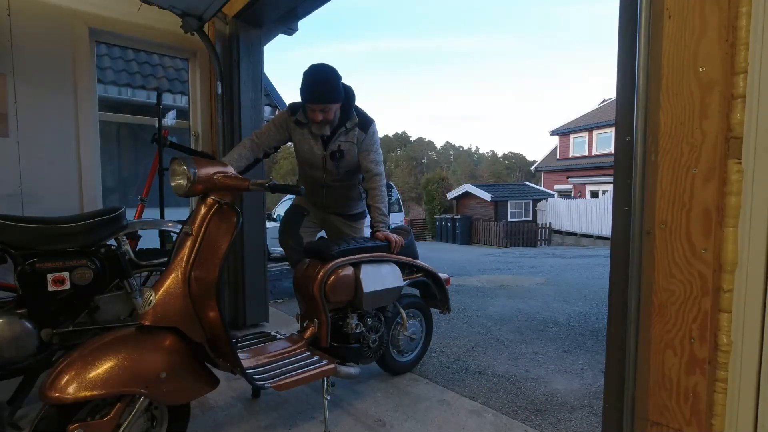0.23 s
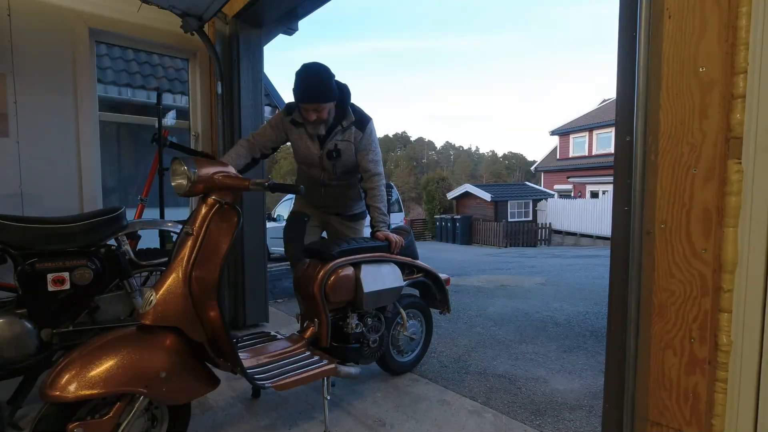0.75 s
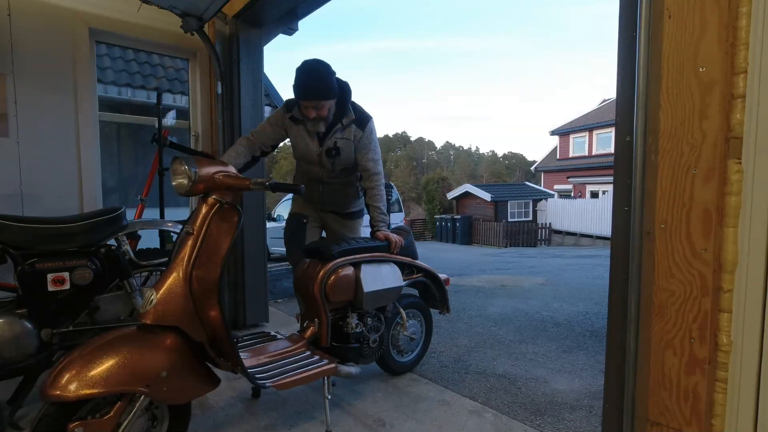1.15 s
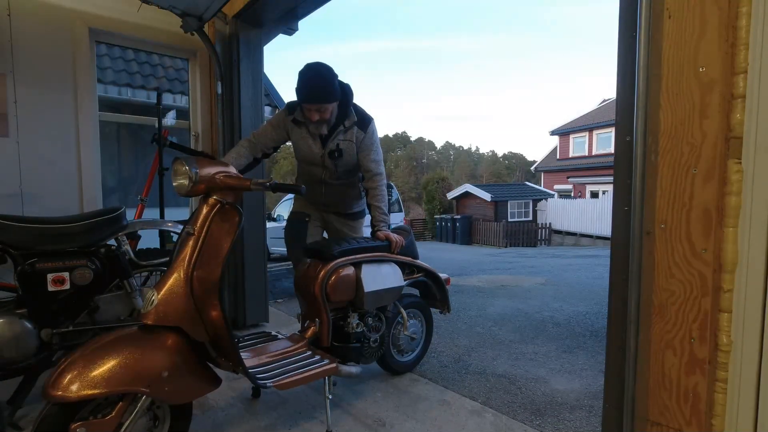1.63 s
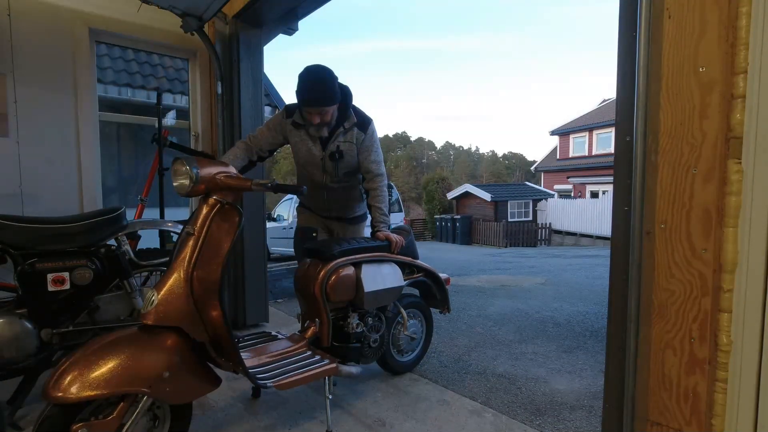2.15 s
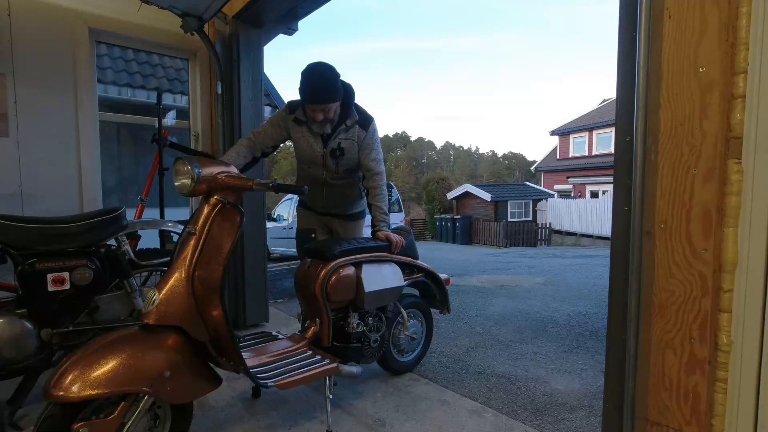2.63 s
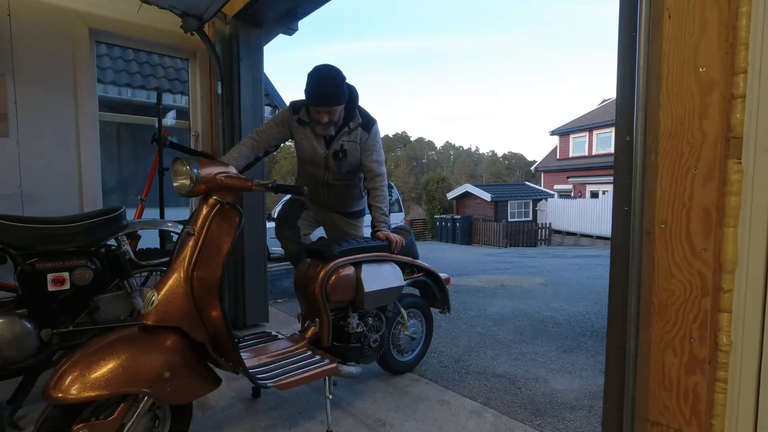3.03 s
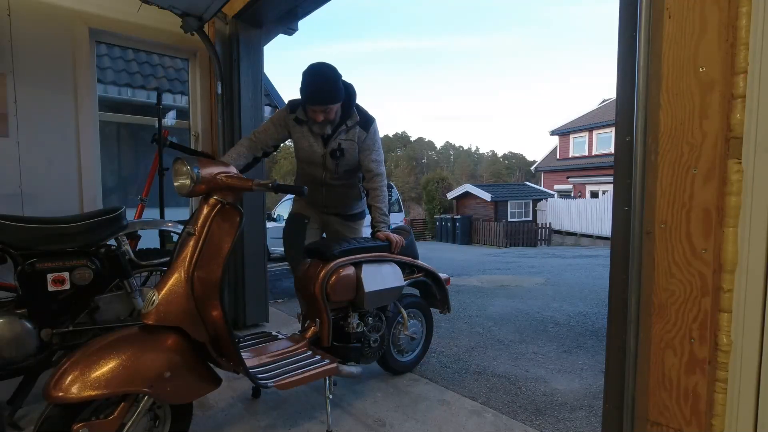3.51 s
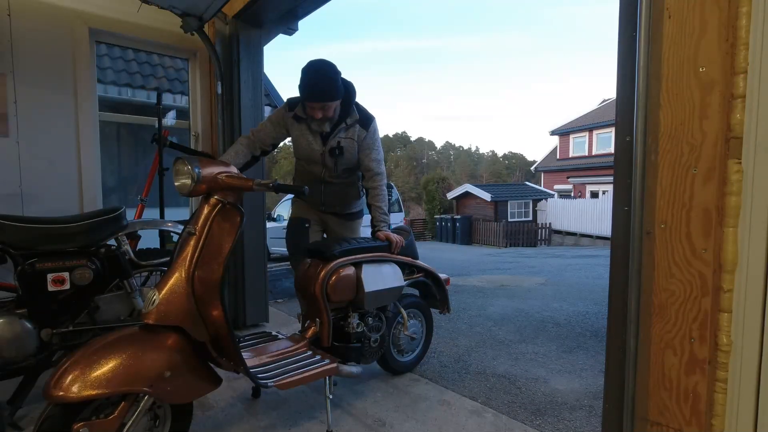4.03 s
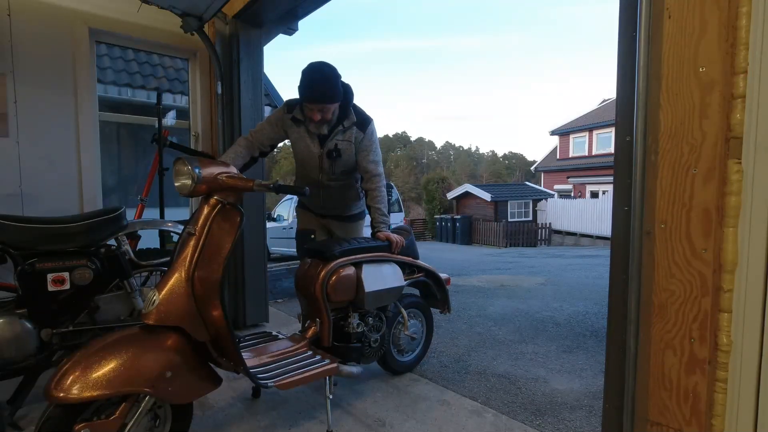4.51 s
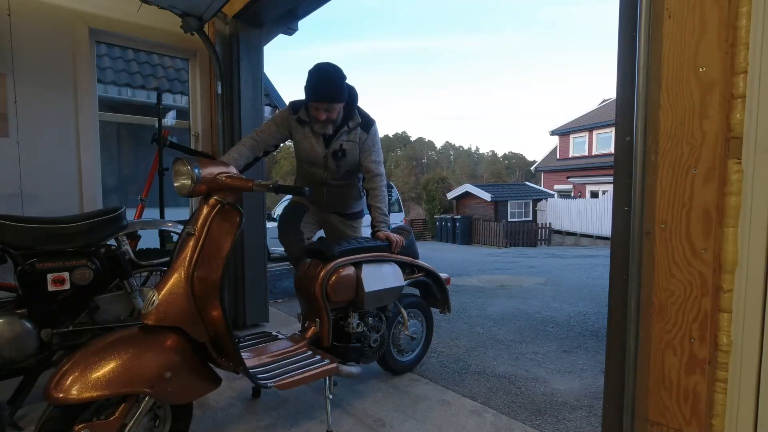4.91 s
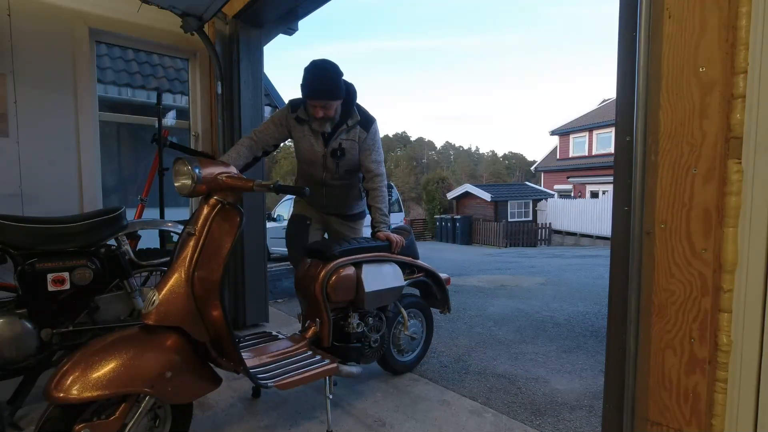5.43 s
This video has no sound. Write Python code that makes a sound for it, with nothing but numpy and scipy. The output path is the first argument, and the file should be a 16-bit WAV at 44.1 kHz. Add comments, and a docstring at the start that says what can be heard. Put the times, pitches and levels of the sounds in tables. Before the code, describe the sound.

A scooter's engine is eased over with thin, whistling hisses of air and soft, dull bumps. The starter is kicked and the engine gives a brief, hollow, raspy churn without firing, then the lever springs back with ringing steel clacks. After more hissing comes a second failed kick, more clacks and a small rattle from the stand. It is heard from close by in a garage doorway, with a short echo and faint outdoor air.

```python
"""A small leak hisses and whistles as a two-stroke scooter's piston rises, and breathes as it returns.
The scooter is kicked over twice at a garage door and does not fire. Each kick whirls the gears
and pumps a hollow, gliding note through the engine; then the stiff lever springs back and clacks
twice on its stop, ringing the steel body. The scooter settles on its stand with a loose rattle."""
import sys
import numpy as np
from scipy import signal
from scipy.fft import rfft, irfft, next_fast_len
from scipy.io import wavfile
from scipy.ndimage import map_coordinates

SR = 44100
rng = np.random.default_rng(int(sys.argv[2]) if len(sys.argv) > 2 else 0)


def int16_out(signal):
    """Quantize to a 16-bit WAV file."""
    q = np.round(np.clip(np.atleast_2d(signal).T, -1, 1) * 32767)
    wavfile.write(sys.argv[1], SR, q.astype(np.int16))


N = 249606

# Two compressions per kick. Each row: start, rise and hiss length in seconds,
# then hiss, knock and rasp levels in dB.
COMPRESSIONS = [(2, 0.013, 0.021, -32, -30, -31.5), (2.094, 0.0021, 0.054, -31, -34, -36),
                (4.328, 0.014, 0.031, -33.5, -36, -32.5), (4.4227, 0.0026, 0.07, -31.5, -33.5, -32)]


def amp(db):
    """Decibels to gain."""
    return 10 ** (np.asarray(db) / 20)


def unit(x):
    """Scale to rms 1."""
    return x / np.sqrt(np.mean(x ** 2) + 1e-20)


def interp_log(points, hz):
    """Interpolate (Hz, value) rows on a log frequency axis."""
    point_hz, value = np.transpose(points)
    return np.interp(np.log(hz + 1e-6), np.log(point_hz), value)


def colour(x, spectrum):
    """Filter by (Hz, dB) rows."""
    hz = np.fft.rfftfreq(len(x), 1 / SR)
    return irfft(rfft(x) * amp(interp_log(spectrum, hz)), len(x))


def noise(spectrum, size=N):
    """Coloured noise, rms 1."""
    return unit(colour(rng.standard_normal(next_fast_len(size)), spectrum)[:size])


def resonate(x, modes):
    """Sum of (Hz, width Hz, dB) resonances, each applied twice for steep skirts; rms 1."""
    out = 0
    for hz, width_hz, db in modes:
        b, a = signal.iirpeak(hz, hz / (1.72 * width_hz), SR)
        out = out + amp(db) * unit(signal.lfilter(b, a, signal.lfilter(b, a, x)))
    return unit(out)


def wander(rate_hz):
    """Smooth random drift, rms 1."""
    return noise([(rate_hz, 0), (2 * rate_hz, -40), (20 * rate_hz, -120)])


def swell(hold_s, rise_s, release_db_per_s, sag_db_per_s, bend=2):
    """Envelope: power-law rise, steady sag, release after hold_s."""
    t = np.arange(SR * 3 // 4) / SR
    fall_db = sag_db_per_s * t + release_db_per_s * np.maximum(t - hold_s, 0)
    return np.minimum(t / rise_s, 1) ** bend * amp(-fall_db)


def add(mix, start_s, sound):
    """Mix a sound in at start_s."""
    part = mix[max(round(start_s * SR), 0):][:len(sound)]
    part += sound[:len(part)]


def outdoor_air(level_db=-67, drift_db=0.5):
    """Faint, drifting yard air, as a mid and side pair."""
    # Each row: frequency in Hz, level in dB.
    air_spectrum = [(15, -42.5), (25, -18.5), (126, -2.5), (322, -3), (433, -6), (997, -12), (1140, -16),
                    (1270, -14), (1620, -22), (2120, -18.5), (4870, -27.5), (6050, -26.5), (8350, -30),
                    (12000, -36.5), (15000, -41.5)]
    breeze = amp(level_db + drift_db * wander(rate_hz=2.3))
    return breeze * noise(air_spectrum), breeze * noise(air_spectrum)


def garage(x, build_s=0.011):
    """Dense reflections build up and die, each band at its own speed."""
    # Each row: frequency in Hz, t60 in seconds.
    decay_times = [(100, 0.7), (400, 0.51), (1000, 0.63), (2800, 0.44), (7000, 0.29), (14000, 0.37)]
    hz, t, bands = signal.stft(rng.standard_normal(SR * 3 // 4), SR, nperseg=256)
    damping = amp(-60 * t / interp_log(decay_times, hz)[:, None])
    _, tail = signal.istft(bands * damping, SR, nperseg=256)
    tail *= 1 - np.exp(-np.arange(len(tail)) / SR / build_s)
    return signal.fftconvolve(x, tail / np.linalg.norm(tail))[:N]


def stereo(direct, diffuse_mid, diffuse_side, echo_decay_s=0.012):
    """Two close microphones: direct sound is nearly alike in both, diffuse treble is not."""
    # Each row of both: frequency in Hz, side gain in dB.
    direct_width = [(120, -48), (400, -69), (1400, -46.5), (2400, -38.5), (5000, -46.5), (10000, -11)]
    diffuse_width = [(100, -44), (700, -69), (1400, -61.5), (2400, -25.5), (4400, -2), (10000, -13.5)]
    t = np.arange(SR // 10) / SR
    echoes = rng.standard_normal(len(t)) * np.exp(-t / echo_decay_s)  # off door frame and floor
    near_side = signal.fftconvolve(direct, echoes / np.linalg.norm(echoes))[:N]
    mid = direct + diffuse_mid
    side = colour(near_side, direct_width) + colour(diffuse_side, diffuse_width)
    return np.array([(mid + side) * amp(-0.15), mid - side])


def pivot_squeaks(jitter_hz=220):
    """The lever's dry pivot gives short, gliding squeals."""
    # Each row: start in seconds, level in dB, first and last pitch in Hz, length in seconds.
    squeaks = [(0.945, -67, 3250, 3010, 0.084), (3.816, -68, 2740, 3800, 0.08),
               (4.03, -76.5, 2500, 3160, 0.05)]
    out = np.zeros(N)
    for start_s, db, first_hz, last_hz, length_s in squeaks:
        hz = np.linspace(first_hz, last_hz, int(length_s * SR))
        hz += jitter_hz * wander(rate_hz=270)[:len(hz)]
        squeal = np.sin(2 * np.pi * np.cumsum(hz) / SR)
        add(out, start_s, amp(db) * 2 * np.hanning(len(hz)) * squeal)
    return out


def stand_scrape(start_s=5.366, level_db=-39):
    """The stand's foot slides a little over the concrete."""
    # Each row: frequency in Hz, level in dB.
    scrape_spectrum = [(200, -10), (500, 22.5), (1400, 9), (2100, 11), (2600, -33), (8000, -43)]
    out = np.zeros(N)
    envelope = swell(hold_s=0.08, rise_s=0.005, release_db_per_s=150, sag_db_per_s=120)
    add(out, start_s, amp(level_db) * envelope * noise(scrape_spectrum, len(envelope)))
    return out


def thuds(sharp=0.19, relax_s=0.006):
    """Piston air, boot and rocking body bump dully: a low tone that starts sharp, with noise round it."""
    # Each row: start in seconds, level in dB, pitch in Hz, rise in seconds, tone's share of the power.
    bumps = [(0.498, -52, 393, 0.0085, 0.08), (.725, -35.5, 462.6, 0.01, 0.73),
             (0.725, -47.5, 213, 0.01, 0.9), (0.789, -46, 455, 0.0066, 0.85),
             (0.822, -56, 450.4, 0.0079, 0.74), (1.286, -45, 284.5, 0.021, 0.38),
             (1.345, -43, 283.4, 0.018, 0.37), (1.501, -60, 237, 0.017, 0.08),
             (1.816, -57, 199, 0.01, 0.53), (2.115, -35.5, 401, 0.0078, 0.9), (2.207, -36, 301, 0.008, 0.4),
             (2.237, -43, 190, 0.0045, 1), (2.64, -53.5, 225, 0.0058, 0.7), (2.794, -57, 205, 0.027, 0),
             (2.949, -42.5, 217, 0.0043, 1), (3.012, -33, 532.5, 0.013, 0.58),
             (3.098, -27.5, 448, 0.0076, 0.72), (3.17, -34.5, 439, 0.017, 0.4),
             (3.339, -41, 443, .006, 0.96), (3.416, -33, 495, 0.0047, 0.3),
             (3.427, -30.5, 286, 0.0052, 0.47), (3.444, -39, 476, 0.0056, 0.24),
             (3.481, -44, 428, 0.0078, 0.13), (4.792, -57, 177, 0.024, 0.12), (5.072, -27, 482, 0.006, 1),
             (5.366, -36, 567, 0.0064, 0.54), (5.377, -31, 264, 0.0054, 0.6)]
    # Noise round a bump. Each row: ratio to the pitch, level in dB.
    spread_spectrum = [(.15, -44), (.45, -9), (.72, -1), (1.3, 1), (2.2, -10.5), (4, -23), (12, -33),
                       (40, -67.5)]
    out, t = np.zeros(N), np.arange(SR // 4) / SR
    for start_s, db, hz, rise_s, share in bumps:
        spread = noise([(ratio * hz, band_db) for ratio, band_db in spread_spectrum], len(t))
        cycles = np.cumsum(hz * (1 + sharp * np.exp(-t / relax_s))) / SR
        tone = unit(np.sin(2 * np.pi * cycles))
        push = t / rise_s * np.exp(1 - t / rise_s)
        add(out, start_s, amp(db) * push * (np.sqrt(share) * tone + np.sqrt(1 - share) * spread))
    return out


def leak_whistle():
    """The leak's resonances, shifting a little in pitch from push to push."""
    # Each row: frequency and width in Hz, level in dB.
    whistle_modes = [(2053, 85, -15), (2620, 42, -16.5), (3027, 440, -17), (5420, 90, -21.5),
                     (6107, 190, 1.5), (6356, 160, -4), (7060, 110, -11.5), (7140, 73, -19),
                     (8200, 120, -30.5), (9400, 130, -24.5), (10250, 150, -23.5), (11350, 220, -26.5),
                     (11950, 146, -33)]
    # Each row: time in seconds, pitch shift in cents.
    pitch_bend = [(0.101, 55), (0.723, 20), (0.851, 5), (2.049, -4), (3.599, 0), (3.902, 22), (5.599, 7.5)]
    whistle = resonate(rng.standard_normal(N), whistle_modes)
    cents = np.interp(np.arange(N) / SR, *np.transpose(pitch_bend))
    return map_coordinates(whistle, [np.cumsum(2 ** (cents / 1200))], order=5, mode="reflect")


def leak(jet_db=-15, growth=0.7, reference_db=-43, flutter_db=1.0, rough_db=1.4):
    """Air through a small leak: firm, slow pushes whistle; faint puffs and fast kicks are breathier."""
    # Whistling hisses as the piston rises, faint breathy draws as it returns.
    # Each row: start and length in seconds, level in dB, rise in seconds, extra rush in dB.
    puffs = [(0.062, 0.063, -46, 0.019, 0), (0.231, 0.03, -66, 0.03, 18.5), (0.684, 0.15, -41.5, 0.021, -7),
             (0.94, 0.056, -62, 0.04, 6.5), (1.177, 0.024, -73, 0.022, 6), (1.953, 0.056, -63.5, 0.018, 14),
             (2.316, 0.21, -46, 0.051, -0.5), (2.727, 0.07, -61.5, 0.039, 12),
             (2.913, 0.096, -42.5, 0.065, 12), (3.511, 0.17, -47, 0.074, 2.5),
             (3.729, 0.15, -54.5, 0.12, 4), (4.021, 0.053, -67.5, 0.035, 6), (4.2, 0.18, -65, .016, 7),
             (4.501, 0.066, -49.5, 0.027, 11), (4.624, 0.059, -64.5, 0.031, 14),
             (4.838, 0.12, -66.5, 0.035, 22), (5.559, 0.057, -54.5, 0.007, 6.5),
             (5.594, 0.06, -47, 0.014, -2)]
    # Each row: frequency in Hz, level in dB.
    jet_spectrum = [(600, -17), (1700, -1), (2300, 4.5), (3300, 3.5), (4400, -3.5), (5400, 3.5), (6100, -1),
                    (7100, -3.5), (7900, -1.5), (9200, -9.5), (10400, -4.5), (13000, -12.5), (15500, -30.5)]
    flow, broad = np.zeros((2, N))
    for start_s, length_s, db, rise_s, rush_db in puffs:
        pressure = amp(db) * swell(length_s, rise_s, release_db_per_s=403.5, sag_db_per_s=45)
        add(flow, start_s, pressure)
        add(broad, start_s, amp(rush_db) * pressure)
    for start_s, rise_s, length_s, db, *_ in COMPRESSIONS:  # dies faster at cranking speed
        pressure = amp(db) * swell(length_s, rise_s, release_db_per_s=660, sag_db_per_s=105.5)
        add(flow, start_s, pressure)
        add(broad, start_s, pressure)
    rush = broad * amp(jet_db) * (1 + growth * flow / amp(reference_db))
    rush *= unit(amp(rough_db * wander(rate_hz=460)))
    whistle = flow * leak_whistle()
    return amp(flutter_db * wander(rate_hz=76)) * (whistle + rush * noise(jet_spectrum))


def ratchet_rasp(grains_per_s=400, scatter_db=5, decay_s=0.018):
    """Ratchet teeth grind under each compression: a short, bright burst of grit."""
    # Each row: frequency in Hz, level in dB.
    grit_spectrum = [(1500, -8.5), (3000, 2.5), (4500, -17.5), (6100, 11), (6800, -12), (7400, 10),
                     (8300, 4.5), (9200, -7), (10400, 2), (12500, -14), (14500, -27)]
    load, t = np.zeros(N), np.arange(SR // 5) / SR
    for start_s, rise_s, *_, db in COMPRESSIONS:
        attack = np.minimum(t / rise_s, 1) ** 2
        release = np.exp(-np.maximum(t - 1.02 * rise_s, 0) / decay_s)
        add(load, start_s, amp(db) * attack * release)
    grains = (rng.random(N) < grains_per_s / SR) * rng.choice([-1, 1], N)
    sizes = amp(scatter_db * rng.uniform(-1.1, 1, N))
    return load * unit(colour(grains * sizes, grit_spectrum))


def pumping(rough_db=2.2):
    """Air in crankcase and exhaust swings at one hollow note that sinks and climbs with the piston."""
    # One curve per kick. Each row: time in seconds, pitch in Hz, level in dB.
    glides = [
        [(1.998, 227.4, -60), (2.02, 198, -30.5), (2.033, 172.4, -35), (2.046, 153, -21.5), (2.062, 85.4, -43),
         (2.08, 115.4, -35), (2.095, 161, -25.5), (2.11, 170, -37), (2.132, 165, -35.5), (2.17, 160, -58)],
        [(4.334, 232, -58), (4.352, 224.7, -30.5), (4.364, 175.4, -32.5), (4.376, 156, -22.5), (4.39, 85, -33),
         (4.412, 127, -38.5), (4.43, 171, -29), (4.447, 207, -31.5), (4.467, 156, -38), (4.52, 158, -54)],
    ]
    out = np.zeros(N)
    for glide in glides:
        times_s, hz, db = np.transpose(glide)
        t = np.arange(times_s[0], times_s[-1], 1 / SR)
        cycles = np.cumsum(np.interp(t, times_s, hz)) / SR
        add(out, times_s[0], amp(np.interp(t, times_s, db)) * unit(np.sin(2 * np.pi * cycles)))
    return out * amp(rough_db * wander(rate_hz=110))


def cranking(push_s=0.15, teeth_hz=190, slip=0.14, churn=2.2, modes_db=-4):
    """Gear teeth knock unevenly and air churns in the engine case, swelling and fading with each kick."""
    # Each row: start in seconds, level in dB, run-down in dB per second, spin-up in seconds.
    kicks = [(1.983, -30.5, 142, 0.037), (4.308, -30, 177, 0.057)]
    # What the case lets out. Each row: frequency in Hz, level in dB.
    case_spectrum = [(25, -39.5), (55, -16), (100, -12.5), (130, -14.5), (200, -4.5), (270, -3.5),
                     (340, -7), (400, -6), (570, -8), (800, -15.5), (1500, -23), (3500, -30), (8000, -32),
                     (15000, -44.5)]
    # Case and exhaust. Each row: frequency and width in Hz, level in dB.
    case_modes = [(187, 88, -4), (229, 60, 0.5), (398, 24, -7.5), (564, 21, -15.5), (1027, 110, -7.5),
                  (1271.6, 7.3, -8.5), (4970, 160, -18)]
    spin = np.zeros(N)
    for start_s, db, run_down_db_per_s, spin_up_s in kicks:
        envelope = swell(push_s, spin_up_s, run_down_db_per_s, sag_db_per_s=8, bend=1.23)
        add(spin, start_s, amp(db) * envelope)
    teeth_passed = np.cumsum(teeth_hz * (1 + slip * wander(rate_hz=25))) / SR
    knocks = np.diff(np.floor(teeth_passed), prepend=0) * rng.uniform(0.1, 1, N)
    drive = unit(knocks - knocks.mean()) + churn * rng.standard_normal(N)
    return spin * unit(unit(colour(drive, case_spectrum)) + amp(modes_db) * resonate(drive, case_modes))


def softness_db(hz, bright_hz, order=2.6):
    """A soft contact loses the treble above bright_hz."""
    return -10 * np.log10(1 + (hz / bright_hz) ** (2 * order))


def body_ring(t, bright_hz, favoured_hz, boost_db, scatter_db=3.0, favour_octaves=0.059, split_hz=11):
    """The struck spot favours one body mode; loose panels split every mode into a beating pair."""
    # Each row: frequency in Hz, level in dB, t60 in seconds.
    body_modes = [(409.6, -3.5, 0.79), (446, -11.5, 0.19), (516, -10, .36), (548, 8.5, 0.28),
                  (624, -8.5, 1), (728, 1.5, 0.31), (890, -2, 0.69), (935, 0, 0.41), (1000, 2, 0.32),
                  (1116, -11, 0.45), (1268, 3, 0.31), (1289, 8.5, 0.14), (1464, -7, 0.5),
                  (2450, -11.5, 0.43), (2960, -6.5, 0.18), (3470, -12, 0.16), (4050, -7, 0.17),
                  (4400, -8, 0.26), (4818, -6.5, 0.18), (5180, -9, 0.3), (5360, -1, 0.17), (5800, -7, 0.23),
                  (6200, -1.5, .28), (6880, -5.5, 0.22), (7980, -18, 0.33)]
    mode_hz, mode_db, t60_s = np.transpose(body_modes)
    count = len(body_modes)
    gains = unit(amp(mode_db + softness_db(mode_hz, bright_hz) + scatter_db * rng.standard_normal(count)))
    gains *= amp(boost_db * np.exp(-(np.log2(mode_hz / favoured_hz) / favour_octaves) ** 2))
    pairs_hz = mode_hz + split_hz * rng.standard_normal((2, count))
    waves = sum(np.sin(2 * np.pi * (hz * t[:, None] + rng.random(count))) for hz in pairs_hz)
    damping = amp(-60 * t[:, None] / t60_s)
    return (waves * damping) @ gains / np.sqrt(count)


def steel_clatter(t, bright_hz, decay_s, panels_db=0.5, crack=0.2, crack_s=0.00047):
    """Struck steel gives a crack and a short, dense clatter."""
    # Each row: frequency in Hz, level in dB.
    steel_spectrum = [(40, -48.5), (110, -25), (220, 1.5), (340, -1.5), (480, 0.5), (750, -2.5), (1100, -7),
                      (1700, -10.5), (2700, -6.5), (4000, -13), (6500, -8.5), (8200, -10.5), (10000, -10),
                      (12000, -17), (15000, -34.5)]
    # Lever and panels. Each row: frequency and width in Hz, level in dB.
    panel_modes = [(482, 102, 1), (1228, 78, 1), (1746, 120, -7), (3456, 110, 1), (4308, 410, 3),
                   (4744, 42, -5), (5333, 66, -1.5), (5956, 270, 3), (7010, 130, 0.5), (7810, 170, -5.5)]
    steel = noise(steel_spectrum, len(t))
    steel += amp(panels_db) * resonate(rng.standard_normal(SR), panel_modes)[-len(t):]
    grid_hz = np.geomspace(30, 20000, 80)
    burst = unit(colour(steel, np.c_[grid_hz, softness_db(grid_hz, bright_hz)]))
    return (np.exp(-t / decay_s) + crack * np.exp(-t / crack_s)) * burst


def contacts(knock_bright_hz=8000, knock_decay_s=0.012, knock_mode_hz=4818, knock_boost_db=9):
    """Every blow on steel: the lever's returns, the drive's knock at each compression, stray taps."""
    # Two returns, each a release, stop, rebound, tap and touch of the stand. Each row: start in seconds,
    # level in dB, brightness in Hz, rise and decay in seconds, favoured mode in Hz, its boost in dB.
    lever_returns = [(3.0, -27, 3230, 0.004, 0.013, 4818, 7), (3.094, -26, 6700, 0.0005, 0.02, 4818, 21),
                     (3.166, -23.5, 7100, 0.00025, 0.012, 1230, 1.5),
                     (3.336, -43, 2520, 0.0077, 0.019, 882, 17),
                     (3.4125, -39.5, 2470, 0.0035, 0.0099, 735, 9),
                     (4.919, -30, 1820, 0.0029, 0.011, 541, 4),
                     (5.0056, -24, 7940, 0.00048, 0.012, 5420, 14.5),
                     (5.0684, -23, 7450, 0.00039, 0.0092, 3460, 15),
                     (5.282, -37.5, 2560, 0.0035, 0.0074, 4380, 6),
                     (5.362, -32, 2330, 0.0072, 0.0067, 1281, 8)]
    # Taps and scuffs of boot and linkage. Each row: the first five columns above.
    stray_taps = [(.002, -63.5, 2760, 0.0024, 0.082), (0.4985, -45, 6500, 0.001, 0.0092),
                  (1.291, -53, 2000, .004, 0.0059), (1.358, -52.5, 9100, 0.013, 0.021),
                  (1.5, -69, 2200, 0.0017, 0.012), (1.779, -62, 9000, 0.00072, 0.0044),
                  (1.981, -48.5, 900, 0.0016, 0.011), (2.034, -51, 8000, .002, 0.013),
                  (2.209, -41, 1500, 0.003, 0.0057), (2.641, -55.5, 2610, 0.0006, 0.0039),
                  (2.914, -53.5, 2585, 0.0059, 0.047), (4.375, -40.5, 6000, 0.0011, 0.0057),
                  (4.62, -50.5, 3000, .001, 0.0029), (4.847, -42, 2790, 0.0013, 0.00098),
                  (4.868, -54.5, 1830, 0.002, 0.09), (4.985, -49, 9400, 0.0052, 0.032)]
    knocks = [(start_s, db, knock_bright_hz, rise_s, knock_decay_s, knock_mode_hz, knock_boost_db)
              for start_s, rise_s, _, _, db, _ in COMPRESSIONS]
    return lever_returns + knocks + [(*tap, 1, 0) for tap in stray_taps]  # taps favour no mode


def steel_blows(clatter_db=5.0, ring_db=-3.5, chatter=0.33, typical_s=0.016, full_db=-22, lowest_hz=150):
    """Each blow clatters and rings the body; a longer, harder one leaves more energy ringing."""
    clatter, ring = np.zeros((2, N))
    t = np.arange(SR // 2) / SR
    for start_s, db, bright_hz, rise_s, decay_s, favoured_hz, boost_db in contacts():
        attack = amp(db) * (1 - np.exp(-t / rise_s))
        stored = np.sqrt(decay_s / typical_s) * amp(db - full_db) ** 0.31
        add(clatter, start_s, attack * steel_clatter(t, bright_hz, decay_s))
        add(ring, start_s, stored * attack * body_ring(t, bright_hz, favoured_hz, boost_db))
    clatter *= amp(clatter_db) * unit(np.exp(chatter * wander(rate_hz=354)))  # loose parts
    bass_cut = signal.butter(4, lowest_hz, "high", fs=SR, output="sos")  # small panels radiate no bass
    return signal.sosfilt(bass_cut, [clatter, amp(ring_db) * ring])


def scene(spurt_db=2.5, full_pump_db=-32, engine_cut_hz=65):
    """The scooter straight ahead in the doorway; garage and quiet yard all round."""
    clatter, ring = steel_blows()
    pumped = pumping()
    spurts = amp(spurt_db * np.tanh(pumped / amp(full_pump_db)))  # each air swing chops hiss and grit
    hiss = (leak() + ratchet_rasp()) * spurts + pivot_squeaks()
    engine = cranking() + pumped + thuds() + stand_scrape()
    engine = signal.sosfilt(signal.butter(2, engine_cut_hz, "high", fs=SR, output="sos"), engine)
    into_garage = amp(-6.0) * clatter + amp(-11.5) * hiss + amp(-15.0) * engine
    diffuse_mid, diffuse_side = (garage(into_garage) + air for air in outdoor_air())
    return stereo(clatter + ring + hiss + engine, diffuse_mid, diffuse_side)


def record(dry, edge_hz=14700):
    """Steep low-pass on both channels."""
    low_pass = signal.firwin(255, edge_hz, window=("kaiser", 9), fs=SR)
    return signal.oaconvolve(dry, low_pass[None], "same")


dry = scene()
out = record(dry)
int16_out(out)
```